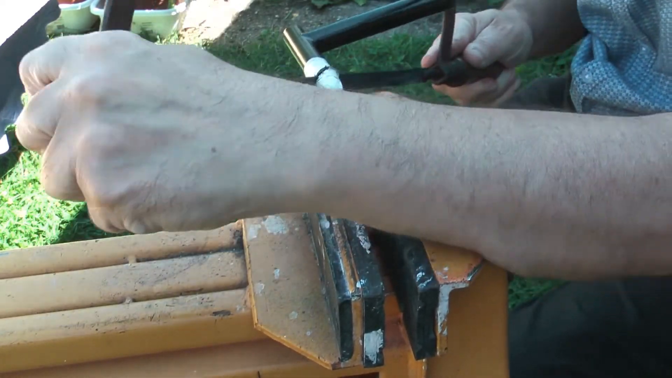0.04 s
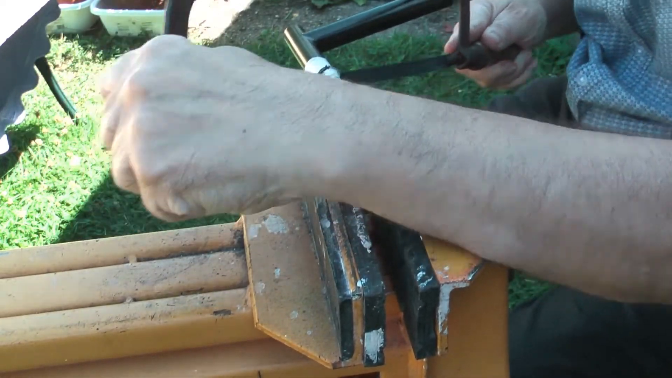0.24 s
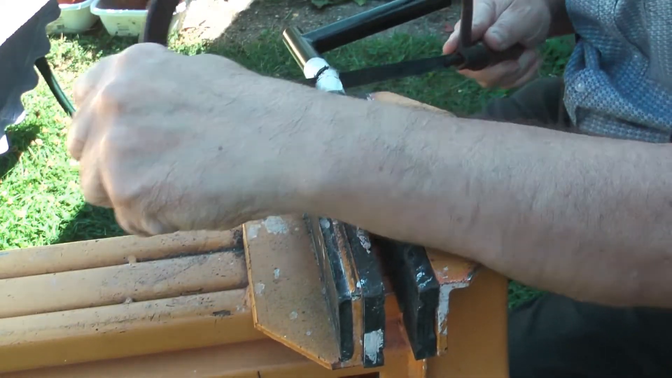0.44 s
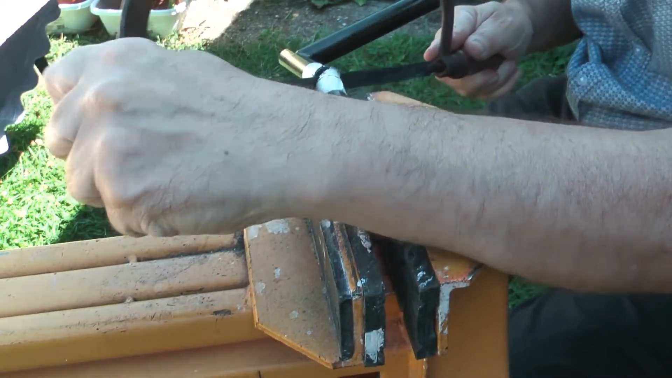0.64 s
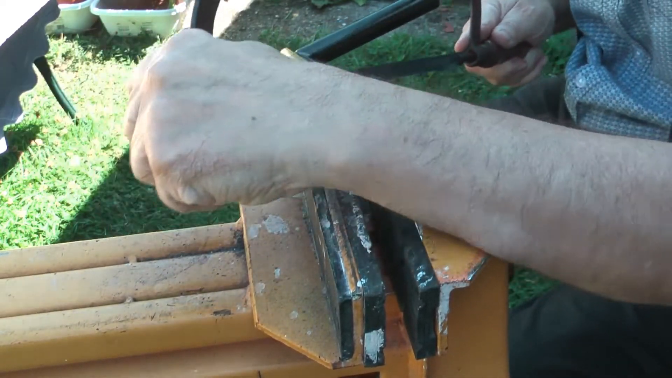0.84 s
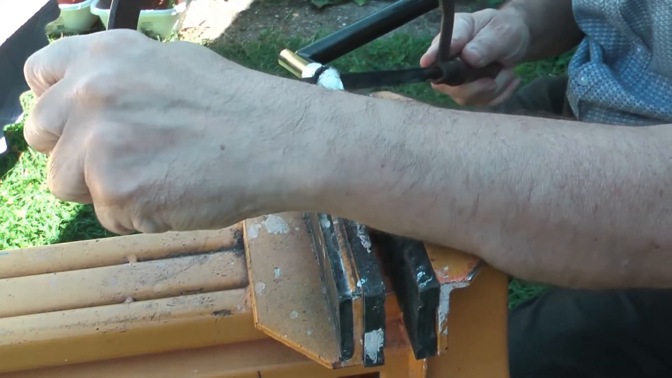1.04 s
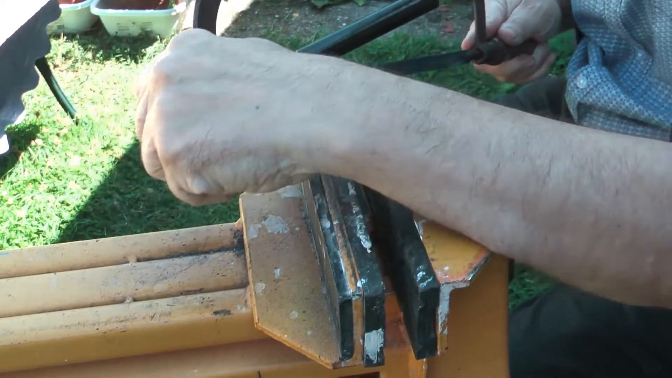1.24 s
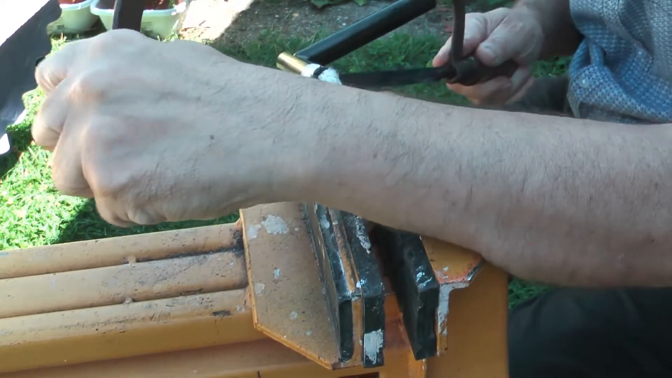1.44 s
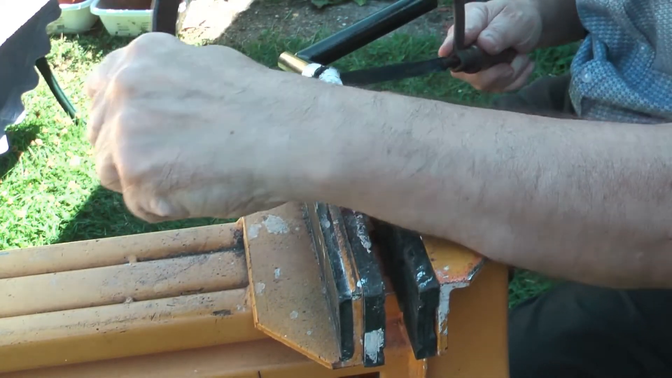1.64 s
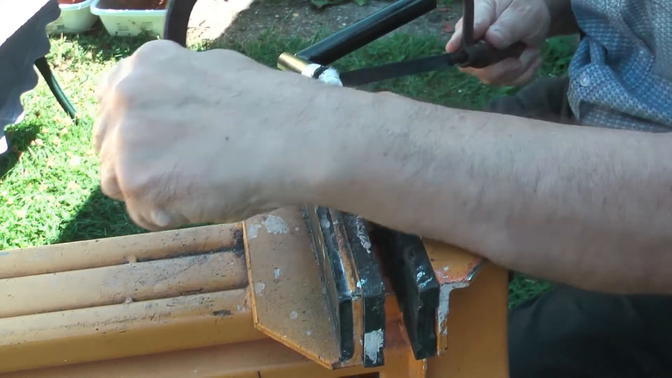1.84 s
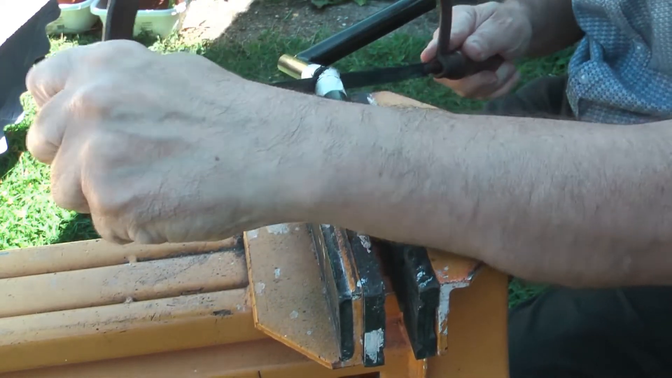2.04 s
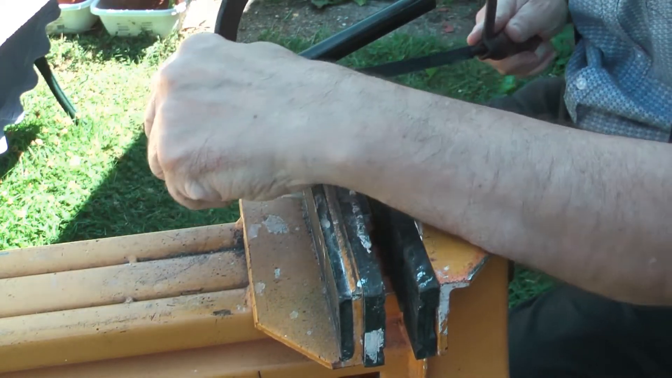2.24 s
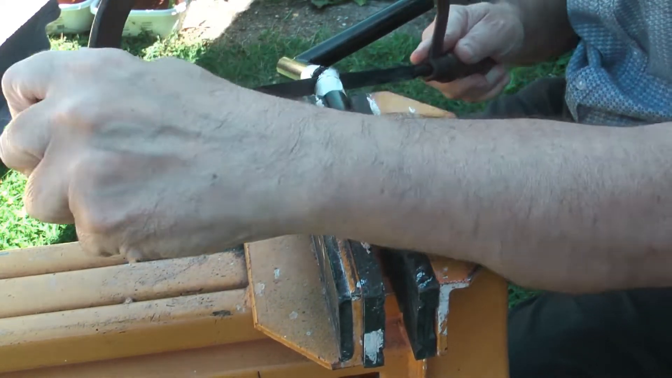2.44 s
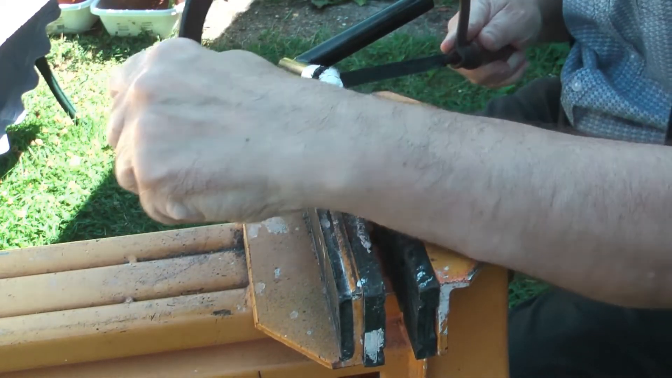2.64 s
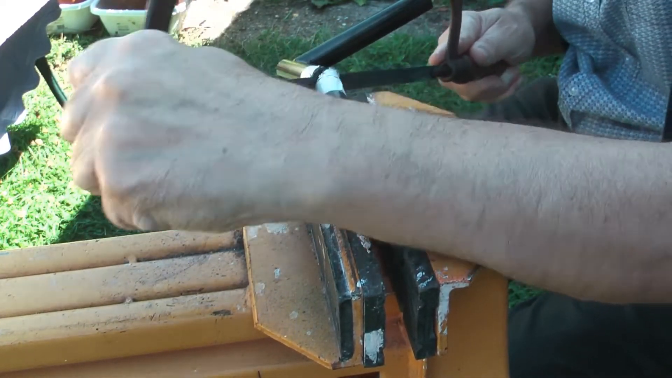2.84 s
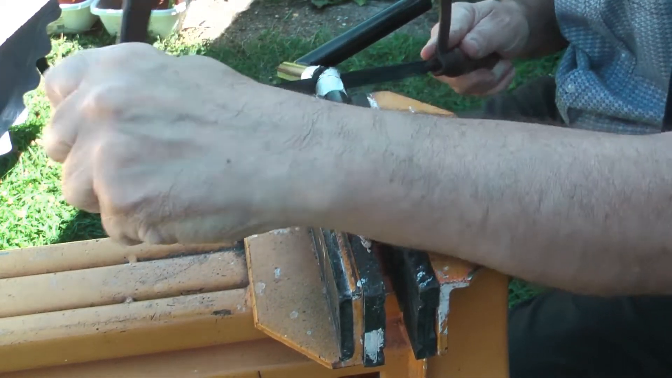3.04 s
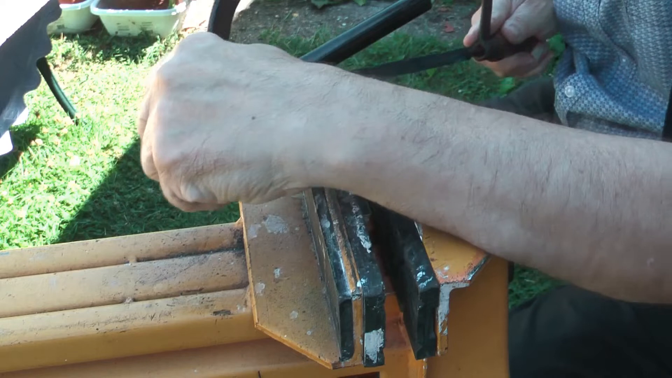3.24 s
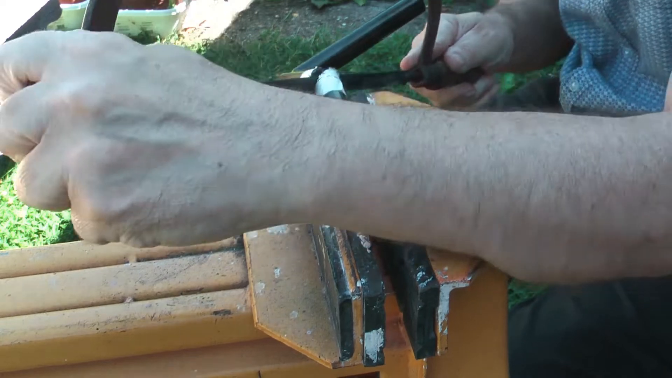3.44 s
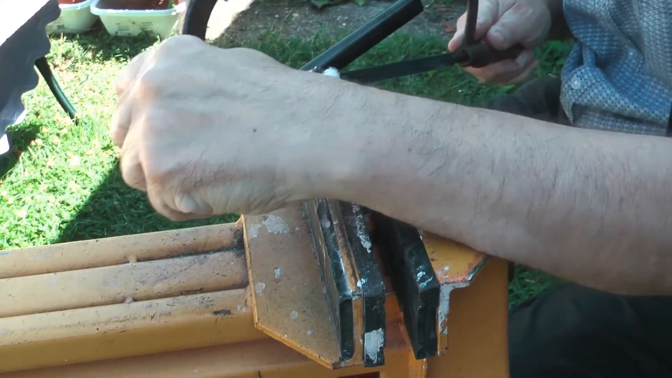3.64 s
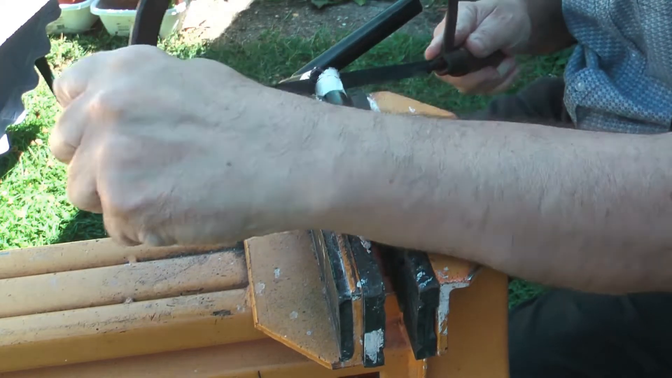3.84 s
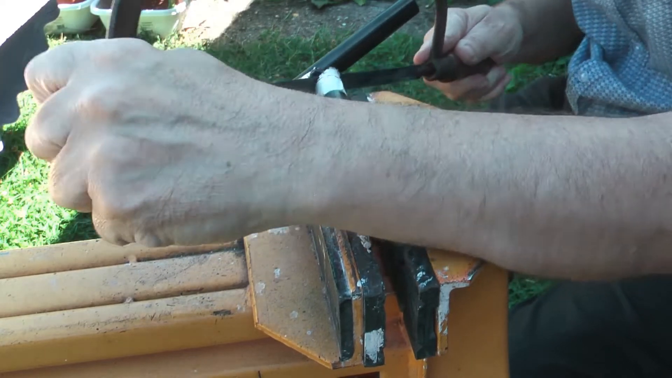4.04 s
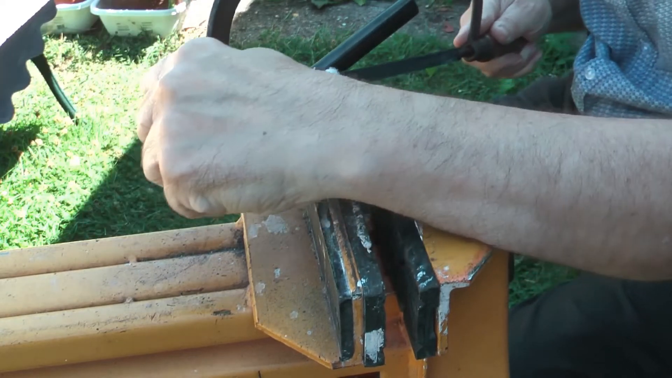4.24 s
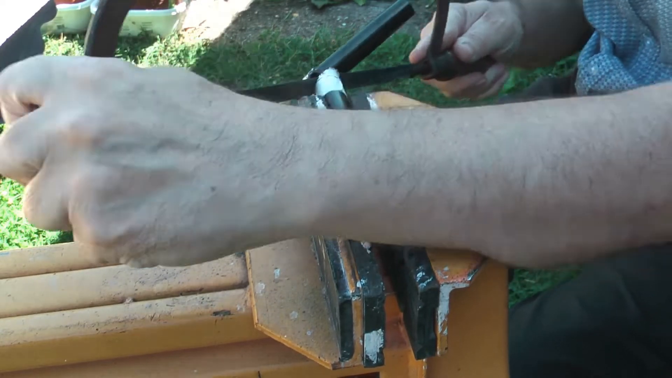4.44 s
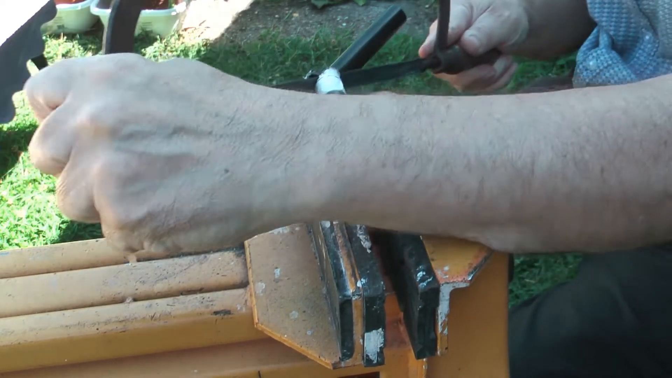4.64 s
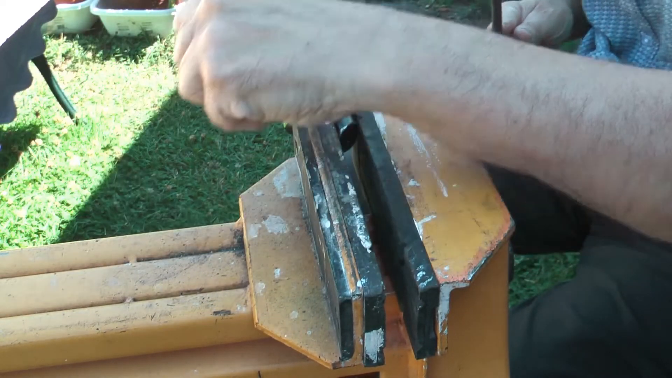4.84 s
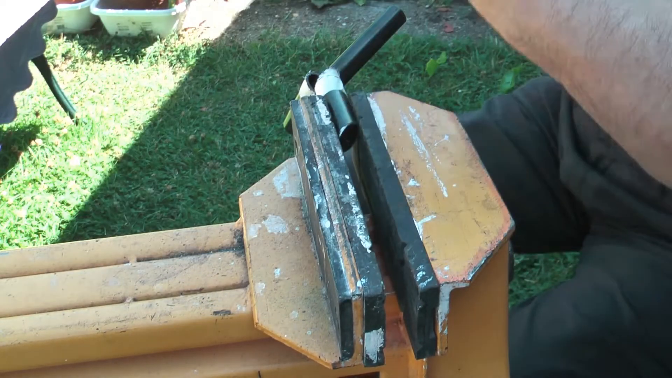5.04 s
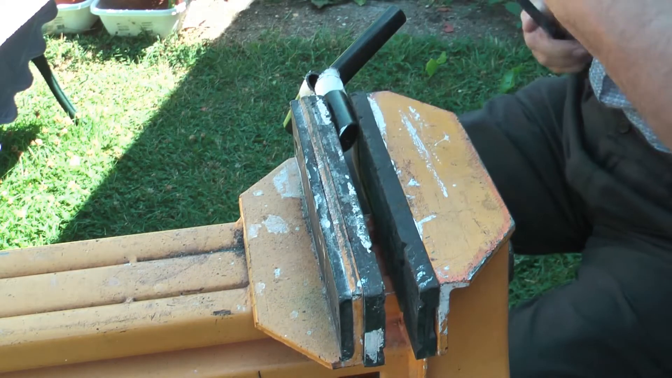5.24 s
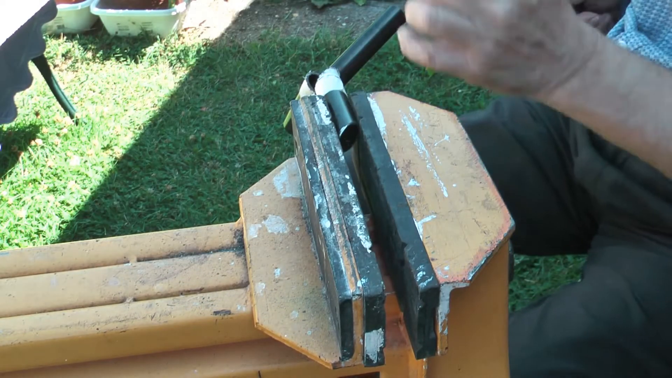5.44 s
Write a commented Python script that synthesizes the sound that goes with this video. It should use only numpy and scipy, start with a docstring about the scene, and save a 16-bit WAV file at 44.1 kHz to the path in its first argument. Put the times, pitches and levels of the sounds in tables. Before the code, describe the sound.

A hacksaw rasps quickly back and forth through a thin metal tube outdoors, then breaks through with a brief metallic ring and near silence.

```python
"""In a garden, a hacksaw cuts a thin metal tube held in a workbench vise, about four strokes a second.
Noisy tooth catches drive resonances of tube, blade and bench; single hard contacts make snags and knocks.
On the last stroke the saw breaks through and the metal rings as plucked, decaying sines.
Wavering coloured noise makes the air, a rustling sleeve and low puffs on the microphone.
The bench bumps softly as some strokes reverse, and the lifted saw ticks lightly at the end."""
import sys
import numpy as np
from scipy import signal
from scipy.fft import rfft, irfft
from scipy.io import wavfile
from scipy.ndimage import uniform_filter1d

SR = 44100
rng = np.random.default_rng(int(sys.argv[2]) if len(sys.argv) > 2 else 0)


def to_wav(sig):
    """Store sig (one row per channel, or 1-D mono) as 16-bit WAV at the path in sys.argv[1].

    Samples outside -1..1 are clipped; the rate is SR.
    """
    pcm = np.clip(np.atleast_2d(sig), -1, 1) * 32767
    pcm = np.round(pcm).astype(np.int16)
    wavfile.write(sys.argv[1], SR, pcm.T)  # frames by channels


N = 242991
TIME = np.arange(N) / SR   # seconds
RING_SIZE = 8192   # length of impulse responses and single blows (samples)
CUTOFF_HZ = 15750   # top of the final sound

# steady garden air: (frequency [Hz], relative level [dB])
GARDEN_COLOUR = [(30, -28), (60, -17), (120, -4), (250, -1.5), (500, 2), (900, -5.5), (1500, -11),
                 (2200, -16), (3000, -22), (4000, -33.5), (5200, -42), (8000, -49), (15500, -50)]
GARDEN_DB = -46.5
# swell of the sleeve rustle: (time [s], level [dB])
SLEEVE_SWELL = [(4.98, -95), (5.09, -81), (5.26, -78), (5.4, -93), (5.51, -85)]
# tone of the sleeve cloth: (frequency [Hz], relative level [dB])
SLEEVE_COLOUR = [(500, -15), (2500, -7), (6000, -4), (8500, -11), (15000, -24)]
# a breeze passes over the microphone: (time [s], level [dB])
BREEZE = [(1.45, -86), (1.56, -42), (1.8, -51), (2.12, -44), (2.48, -41), (2.56, -52), (2.76, -41),
          (2.9, -83)]
# the breeze's strongest puffs, as bell curves: (centre time [s], level [dB], half length [s])
PUFFS = [(1.618, -20, 0.009), (1.902, -39, 0.0077), (2.035, -21.5, 0.0065), (2.08, -29, 0.0073),
         (2.23, -39, 0.018), (2.416, -33.5, 0.014), (2.658, -30.5, 0.011)]
# low turbulence of the breeze: (frequency [Hz], relative level [dB])
PUFF_COLOUR = [(25, -7), (60, -7), (100, 11.5), (180, 1.5), (250, -13.5), (400, -13), (1000, -58)]
# the bench rocks as the stroke reverses: (time [s], peak level [dB])
ROCKS = [(3.04, -50), (3.279, -43), (3.99, -35)]
# dull body of the rocking bench: (frequency [Hz], relative level [dB])
ROCK_COLOUR = [(25, -7), (60, 0), (140, -1), (250, -5), (600, -47), (4000, -100)]
# ring of the parting metal, before small random shifts: (frequency [Hz], level [dB], t60 [s])
PARTING_MODES = [(777, 4, 0.19), (1350, -5.5, 0.15), (2080, 1, 0.12), (2430, -9.5, 0.25),
                 (3300, -13.5, 0.23), (4500, -21, .12), (5900, -17, 0.11)]
# last teeth pluck the nearly severed tube: (time [s], level [dB])
PLUCKS = [(4.752, -26), (4.767, -30), (4.818, -32), (4.839, -40), (4.860, -41.5)]
# teeth snag and chatter, mostly as a stroke gets going: (time [s], peak level [dB], chatter decay [s])
SNAGS = [(.075, -14.5, 0.0096), (0.307, -20, 0.013), (0.54, -18.5, 0.024), (.662, -20.5, .015),
         (0.715, -17.5, 0.012), (0.902, -20, 0.013), (1.603, -46, 0.0096), (1.662, -19, 0.031),
         (2.068, -21, 0.011), (2.319, -30, 0.0089), (2.552, -24, 0.024), (2.841, -22.5, 0.016),
         (3.021, -24.5, 0.037), (3.309, -20.5, 0.013), (3.5263, -16.5, 0.019), (4.139, -22, 0.0066)]
SNAG_HARDNESS_HZ = 4400
# the blade knocks in the slot and jolts the bench:
# (time [s], blade peak level [dB], bench thud relative to it [dB], hardness [Hz])
KNOCKS = [(.6015, -10, -28, 4020), (.626, -13, -9, 10100), (.801, -16.5, -11.5, 8000),
          (2.017, -35, -25, 8000), (3.017, -30, -15, 14000), (3.5, -34, -16, 14000)]
# thud of the bench: (frequency [Hz], relative level [dB])
BENCH_COLOUR = [(30, -24), (150, 1), (500, -6), (1200, -17), (5000, -62), (16000, -90)]
# light ticks as the saw is lifted away: (time [s], peak level [dB])
TICKS = [(5.2845, -56), (5.327, -42.5)]
# strokes, push and pull in turn:
# (start time [s], end time [s], level [dB], rise of pressure along the stroke [dB])
STROKES = [(-.09, .148, -27.5, 9), (.16, .406, -29.5, 3), (.387, .607, -26, 8), (.582, .876, -29.5, 2.5),
           (.855, 1.104, -29.5, 0), (1.086, 1.338, -32.5, -5.5), (1.322, 1.58, -29, 0),
           (1.566, 1.835, -34.5, -3), (1.796, 2.065, -29, -2), (2.036, 2.321, -34.5, -20),
           (2.278, 2.546, -27, 2), (2.539, 2.8, -32, -2.5), (2.775, 3.011, -26.5, 3.5),
           (2.986, 3.275, -29.5, 2.5), (3.249, 3.508, -27, 9), (3.48, 3.772, -31, 3.5),
           (3.752, 4.015, -29, 1.5), (4.053, 4.327, -31.5, -0.5), (4.325, 4.59, -28.5, -9.5),
           (4.598, 4.895, -34, -18.5)]
# what each direction shares, push then pull:
# (power of speed that loudness follows [exponent], growl level [dB], hiss level [dB])
DIRECTIONS = [(1.77, -1.5, -13.5), (1.14, -1.5, -13)]
# broad colour of the push stroke: (frequency [Hz], relative level [dB])
PUSH_COLOUR = [(40, -30), (90, -17), (160, -11), (260, -10), (500, 0.5), (1000, -1.5), (1800, -3),
               (2700, -15), (3600, -14), (4600, -17.5), (6500, -16.5), (8200, -28.5), (11000, -32),
               (15600, -33)]
# broad colour of the pull stroke: (frequency [Hz], relative level [dB])
PULL_COLOUR = [(40, -28), (90, -34), (160, -16.5), (260, -8), (500, 3), (850, 4), (1250, -3), (1800, 0),
               (2500, -13), (3600, -13.5), (6300, -17.5), (8200, -27), (11000, -34), (15600, -36)]
# resonances of tube, blade and vise: (frequency [Hz], width [Hz], lift [dB])
RESONANCES = [(184, 38, 4), (439, 28, 4), (537.3, 24.6, 13), (633.6, 7.8, 6), (709.6, 14.5, 6.5),
              (771.3, 18, 7.5), (866, 14, 5.5), (1221, 9.3, 3), (1373, 65, 4), (1490, 7.9, 9),
              (1623, 27, 7.5), (1683, 28, 8.5), (1766, 27.3, 10.5), (1873, 51, 8), (2011, 44, 9),
              (2162, 11, 8.5), (2333, 160, 7), (2666, 170, 11.5), (2930, 6.8, 5.5), (3234, 59, 9),
              (3452, 15.3, 11), (4022, 88, 8), (5887, 165, 9), (9850, 55, -8), (9960, 89, 8),
              (13040, 137, 9)]
# high modes of the blade: (frequency [Hz], width [Hz], relative level [dB])
BLADE_MODES = [(2800, 7.4, 10), (10520, 26, 1.5), (12400, 43, -3), (13345, 90, -10), (15135, 100, -11)]
BLADE_DB, BLADE_DB_PER_S = -57.5, -1.9   # the deepening slot damps the blade's ring
BLADE_SPREAD = 0.22   # phase of its ring between the ears (radians either way)
GROWL_DB_PER_S = -0.18   # the growl thins as the cut deepens
GROWL_BELOW_HZ, HISS_ABOVE_HZ = 1247, 2970   # the rasp lies between
RUB_DB = -24   # rubbing at the turn, relative to mid-stroke


def from_db(db):
    """Decibels to gain."""
    return 10 ** (np.asarray(db) / 20)


def rms_one(x):
    """Scale to unit power."""
    return x / np.sqrt(np.mean(x ** 2) + 1e-20)


def drift(per_s, size):
    """Random wander of unit power: straight lines between per_s random knots a second."""
    knots = rng.standard_normal(int(size * per_s / SR) + 2)
    position = np.arange(size) * per_s / SR
    return rms_one(np.interp(position, np.arange(len(knots)), knots))


def cut(x, hz, kind):
    """Fourth-order crossover half: its low and high sides add up flat."""
    sos = signal.butter(2, min(hz, .45 * SR), kind, fs=SR, output="sos")
    return signal.sosfilt(np.vstack([sos, sos]), x + 1e-18)


def response(colour, resonances=()):
    """Causal impulse response with a broad colour and ringing peaks."""
    hz = np.maximum(np.fft.rfftfreq(RING_SIZE, 1 / SR), 1)
    points, db = np.transpose(colour)
    colour_gain = from_db(np.interp(np.log(hz), np.log(points), db))
    # folding the cepstrum forward gives minimum phase: the sound starts at the contact
    cepstrum = irfft(np.log(colour_gain))
    cepstrum[1:RING_SIZE // 2] *= 2
    cepstrum[RING_SIZE // 2 + 1:] = 0
    gain = np.exp(rfft(cepstrum))
    for centre, width, lift_db in resonances:
        detuning = (hz ** 2 - centre ** 2) / (hz * width)
        gain = gain * (1 + (from_db(lift_db) - 1) / (1 + 1j * detuning))
    return irfft(gain)


def shake(force, body):
    """Drive a body with a force; white force keeps its power."""
    return signal.fftconvolve(force, body / np.linalg.norm(body))[:len(force)]


def coloured(colour):
    """Noise of a given colour, of unit power before it is coloured."""
    return shake(rng.standard_normal(N), response(colour))


def add(track, s, sound):
    """Mix a short sound in at time s."""
    start = int(np.clip(round(s * SR), 0, N - 1))
    track[..., start:start + sound.shape[-1]] += sound[..., :N - start]


def softened(body, hard_hz):
    """A softer contact puts less treble into a body."""
    return signal.lfilter(*signal.butter(1, min(hard_hz, .45 * SR), fs=SR), body)


def blow(body, chatter_s, chatter_db):
    """One hard contact and a brief chatter after it, through a body; peak 1."""
    fade = np.exp(-TIME[:RING_SIZE] / chatter_s)
    force = from_db(chatter_db) * rng.standard_normal(RING_SIZE) * fade
    force[0] = 1
    sound = signal.fftconvolve(force, body)[:RING_SIZE]
    return sound / np.abs(sound).max()


def garden():
    """Far outdoor air, gently wavering, and a sleeve brushing near by."""
    middle = coloured(GARDEN_COLOUR)
    sides = coloured(GARDEN_COLOUR) * [[1], [-1]]   # opposite in the two ears, for width
    air = from_db(GARDEN_DB) * (middle + from_db(-18.0) * sides)
    sleeve_db = np.interp(TIME, *np.transpose(SLEEVE_SWELL)) + 2.9 * drift(54, N)
    sleeve = from_db(sleeve_db) * coloured(SLEEVE_COLOUR)
    return air * from_db(0.41 * drift(21, N)) + sleeve


def puffs():
    """A lumpy breeze with a few short swells, all low turbulence."""
    swell = from_db(np.interp(TIME, *np.transpose(BREEZE)) + 2.9 * drift(24.8, N))
    for s, db, length in PUFFS:
        swell = swell + from_db(db) * np.exp(-.5 * ((TIME - s) / length) ** 2)
    eddies = coloured(PUFF_COLOUR)
    eddies = eddies / np.sqrt(uniform_filter1d(eddies ** 2, size=1300) + 1e-9)   # even out the level
    sides = coloured(PUFF_COLOUR) * [[1], [-1]]
    return swell * (eddies + from_db(-11.5) * sides)


def scatter(x, t60, dull_hz):
    """Bench, ground and arm throw back a short dull wash, different in each ear."""
    t = TIME[:RING_SIZE]
    wash = rng.standard_normal((2, RING_SIZE)) * from_db(-60 * t / t60) * (t > .003)
    echoes = cut(wash, dull_hz, "low")
    return np.array([shake(x, ear) for ear in echoes])


def rocking():
    """Dull, soft bumps of the bench."""
    out = np.zeros(N)
    for s, peak_db in ROCKS:
        bump = blow(response(ROCK_COLOUR), chatter_s=0.0096, chatter_db=-10)
        add(out, s, from_db(peak_db) * bump)
    return out


def parting():
    """Freed from the cut, the metal rings longer; every pluck has a gritty edge."""
    out, t = np.zeros(N), TIME[:2 * RING_SIZE]
    edge = cut(response(PUSH_COLOUR, RESONANCES), 1820, "high")
    for s, db in PLUCKS:
        ring = np.zeros(len(t))
        for hz, mode_db, t60 in PARTING_MODES:
            fade = from_db(mode_db + rng.normal(0, 1.8) - 60 * t / t60)
            ring += fade * np.sin(2 * np.pi * hz * rng.normal(1, 0.0102) * t)
        add(out, s, from_db(db) * cut(ring, 700, "high"))
        add(out, s, from_db(-33.5) * blow(edge, chatter_s=0.01, chatter_db=-2))
    return out


def bend(body, spread_hz):
    """Bending waves in thin metal carry treble faster than bass, which smears each contact."""
    hz = np.fft.rfftfreq(RING_SIZE, 1 / SR)
    return irfft(rfft(body) * np.exp(-1j * np.sqrt(hz / spread_hz)))


def knocks():
    """Snags and knocks strike the same body, and knocks thud into the bench; later the lifted saw ticks."""
    out = np.zeros(N)
    body = bend(response(PUSH_COLOUR, RESONANCES), spread_hz=2.98)
    bench = response(BENCH_COLOUR)
    thud = bench / np.abs(bench).max()
    for s, peak_db, chatter_s in SNAGS:
        snag = blow(softened(body, SNAG_HARDNESS_HZ), chatter_s, chatter_db=-19.5)
        add(out, s, from_db(peak_db) * snag)
    for s, peak_db, thud_db, hard_hz in KNOCKS:
        knock = blow(softened(body, hard_hz), chatter_s=.005, chatter_db=-19)
        add(out, s, from_db(peak_db) * (knock + from_db(thud_db) * thud))
    light_body = softened(cut(body, 900, "high"), hard_hz=1800)
    for s, peak_db in TICKS:
        add(out, s, from_db(peak_db) * blow(light_body, chatter_s=0.0037, chatter_db=-21))
    return out


def chips(size, per_s, spread_db, fade_s):
    """Chips tear off at random: each is a sudden rise of force that dies away."""
    torn = rng.random(size) < per_s / SR
    tears = torn * from_db(spread_db * np.clip(rng.standard_normal(size), -2, 1.5))
    return signal.lfilter([1], [1, -np.exp(-1 / (fade_s * SR))], tears + 1e-18)


def teeth(speed, top_rate, uneven_db, friction_db, chip_db, wobble_db):
    """Force in the cut: uneven tooth catches at a rate that follows speed, over sliding friction."""
    n = len(speed)
    rate = top_rate * np.maximum(speed, .15)   # catches per second, before jitter
    passed = np.cumsum(rate * np.exp(.35 * drift(500, n))) / SR
    caught = np.diff(np.floor(passed), prepend=0) > 0
    sizes = from_db(uneven_db * np.clip(rng.standard_normal(n), -2, 2)) * rng.choice([-1, 1], n)
    catches = rms_one(caught * sizes / np.sqrt(rate))
    force = catches + from_db(friction_db) * rng.standard_normal(n)
    force = force * (1 + from_db(chip_db) * chips(n, per_s=120, spread_db=1.5, fade_s=0.002))
    steady = force / np.sqrt(uniform_filter1d(force ** 2, size=2600))   # the arm holds the mean force
    return steady * from_db(wobble_db * drift(18.1, n))


def blade_echo(force, place, short_s, travel_s, share):
    """Waves come back from the blade's end; the ripple they make glides as the free length changes."""
    at = np.arange(len(force))
    lag = (short_s * rng.uniform(.85, 1.15) + travel_s * place) * SR
    echo = np.interp(at - lag, at, force, left=0)
    return (force + share * echo) / np.sqrt(1 + share ** 2)


def gripped(modes, detune, vary_db):
    """Each new contact shifts the modes a little and excites them differently."""
    return [(hz * rng.normal(1, detune), width, db + rng.normal(0, vary_db)) for hz, width, db in modes]


def crowded(body, t60, share_db):
    """Crowds of weak modes ripple the colour, differently for each new contact."""
    tail = rng.standard_normal(RING_SIZE) * from_db(-60 * TIME[:RING_SIZE] / t60)
    return body + from_db(share_db) * shake(body, tail)


def singing(force):
    """The tight steel blade rings high up and carries on through the turn, out of step in the two ears."""
    t = TIME[:RING_SIZE]
    ring = np.zeros(RING_SIZE, complex)
    for hz, width, db in BLADE_MODES:
        # a wider mode dies sooner; the root of its width makes up its power
        ring += from_db(db) * np.sqrt(width) * np.exp((2j * np.pi * hz - np.pi * width) * t)
    return np.array([shake(force, np.imag(ring * np.exp(1j * ear * BLADE_SPREAD))) for ear in (1, -1)])


def sawing():
    """Stroke speed sets tooth rate, loudness and brightness; gives the cut and the blade's ring."""
    out, blade = np.zeros(N), np.zeros((2, N))
    for k, (start, end, level_db, lean_db) in enumerate(STROKES):
        steepness, growl_db, hiss_db = DIRECTIONS[k % 2]
        begin = max(start, 0)
        # along runs 0 to 1 over the stroke; place is the blade's position, there and back
        along = np.clip((begin + TIME[:2 * RING_SIZE] - start) / (end - start), 0, 1)
        speed = np.maximum(np.sin(np.pi * along), .06)
        place = (1 - (-1) ** k * np.cos(np.pi * along)) / 2

        force = teeth(speed, top_rate=1500, uneven_db=2.0, friction_db=-3.5, chip_db=-4.0, wobble_db=0.87)
        force = blade_echo(force, place, short_s=.004, travel_s=0.000704, share=0.32)
        # it still rubs at the turn
        effort = np.hypot(speed ** max(steepness, .2), from_db(RUB_DB)) * (along < 1)
        force = force * effort * from_db(lean_db * (along - .5))

        modes = gripped(RESONANCES, detune=0.0027, vary_db=2.0)
        body = response((PUSH_COLOUR, PULL_COLOUR)[k % 2], modes)
        upper = crowded(cut(body, GROWL_BELOW_HZ, "high"), t60=0.026, share_db=-6)
        judder = from_db(1.0 * drift(50.5, len(force)))   # the tube gives unevenly in the vise
        growl = shake(force * judder * speed ** -.18, cut(body, GROWL_BELOW_HZ, "low"))
        growl = growl * from_db(growl_db + GROWL_DB_PER_S * (begin - TIME.mean()))
        rasp = shake(force, cut(upper, HISS_ABOVE_HZ, "low"))
        # near the turn the teeth slide without cutting
        biting = speed ** 0.57 * np.tanh((speed / 0.24) ** 2)
        hiss = from_db(hiss_db) * shake(force * biting, cut(upper, HISS_ABOVE_HZ, "high"))
        add(out, begin, from_db(level_db) * (growl + rasp + hiss))

        # the blade rings up whenever it grazes the wall of the slot
        flare = from_db(8.6 * np.tanh(drift(20.4, len(force))))
        ring_gain = from_db(BLADE_DB + BLADE_DB_PER_S * begin)
        add(blade, begin, ring_gain * singing(force * biting * flare))
    return out, blade


def scene():
    """The saw almost straight ahead, in open air."""
    cutting, blade = sawing()
    saw = cutting + knocks() + parting() + rocking()
    direct = saw * from_db([[.15], [-.15]])
    wash = from_db(-24.5) * scatter(saw, t60=0.085, dull_hz=3150)
    return direct + blade + wash + puffs() + garden()


def record(dry):
    """Deep rumble and the top are cut."""
    dry = signal.sosfilt(signal.butter(2, 30, "high", fs=SR, output="sos"), dry)
    return signal.sosfilt(signal.ellip(10, .2, 70, CUTOFF_HZ, fs=SR, output="sos"), dry)


dry = scene()
out = record(dry)
to_wav(out)
```